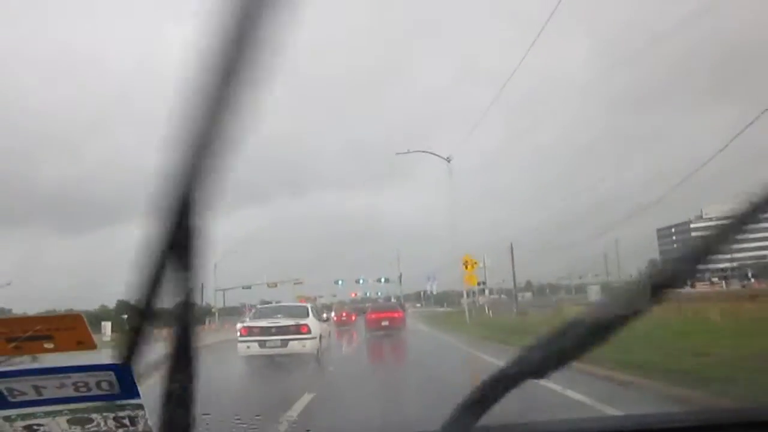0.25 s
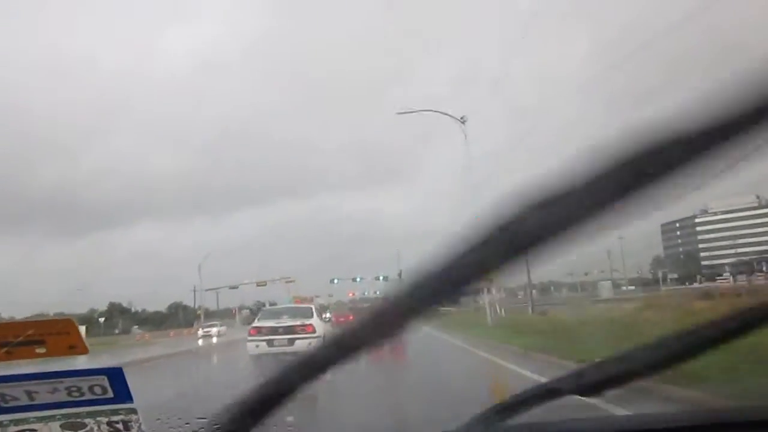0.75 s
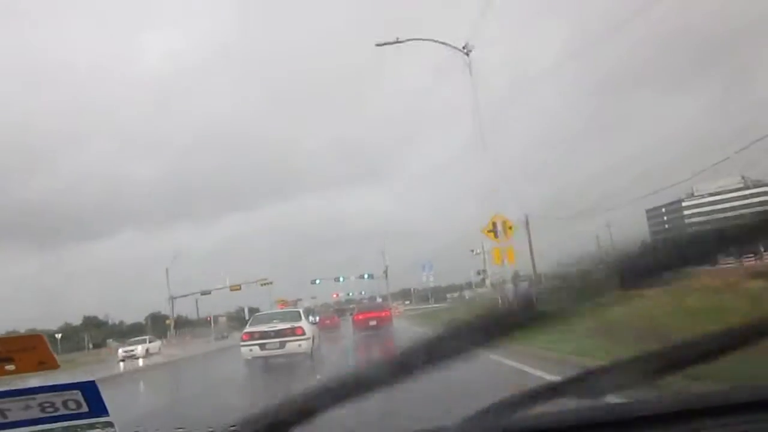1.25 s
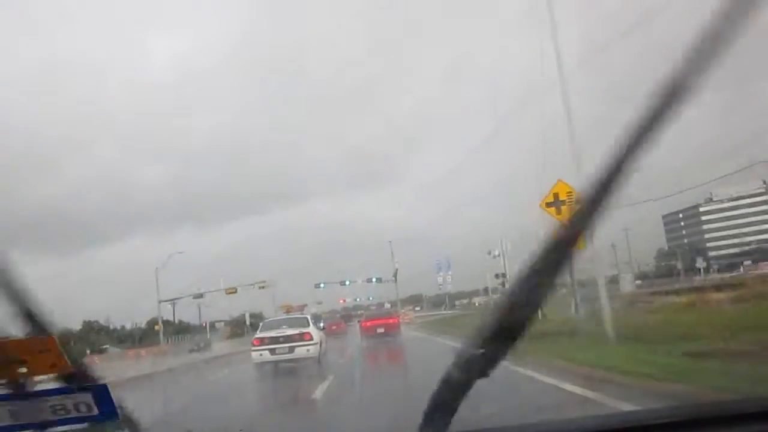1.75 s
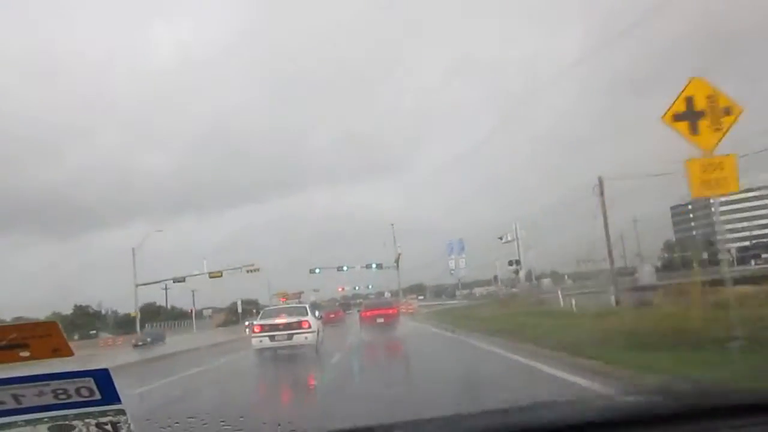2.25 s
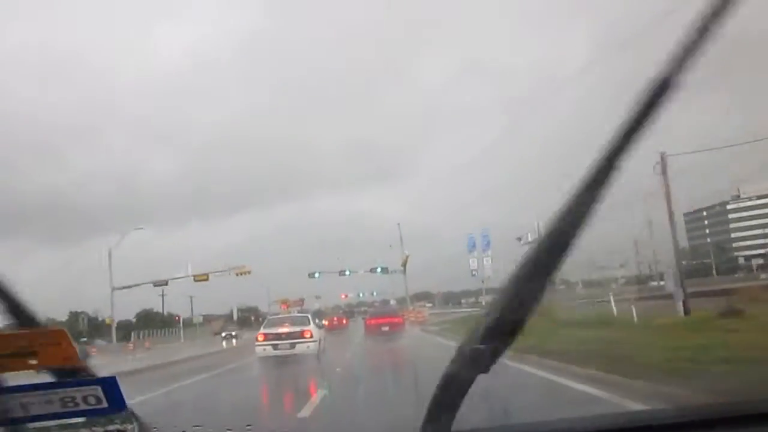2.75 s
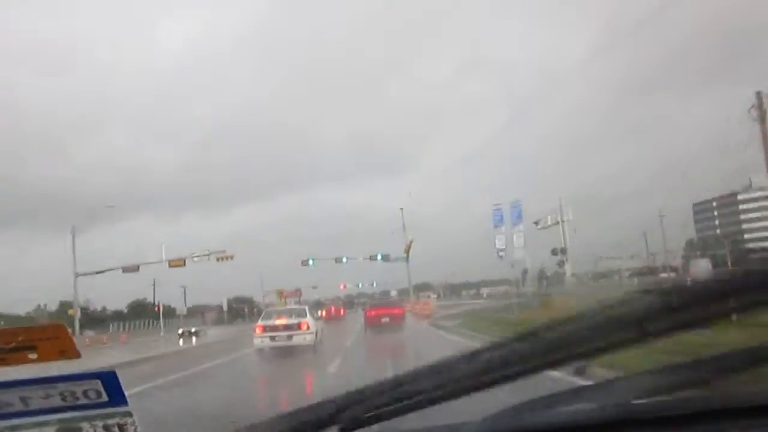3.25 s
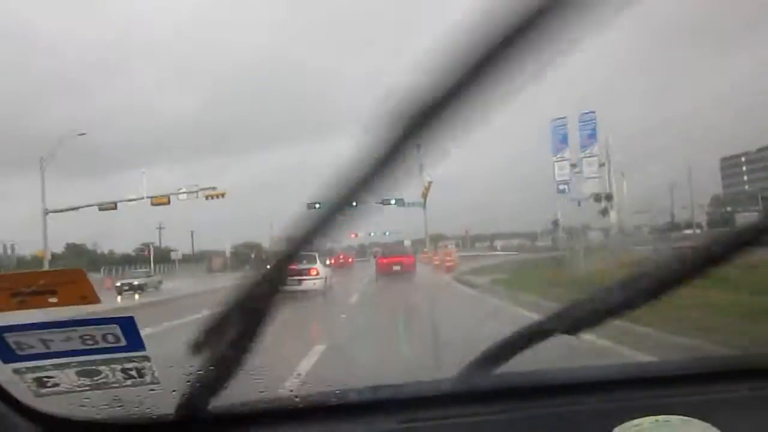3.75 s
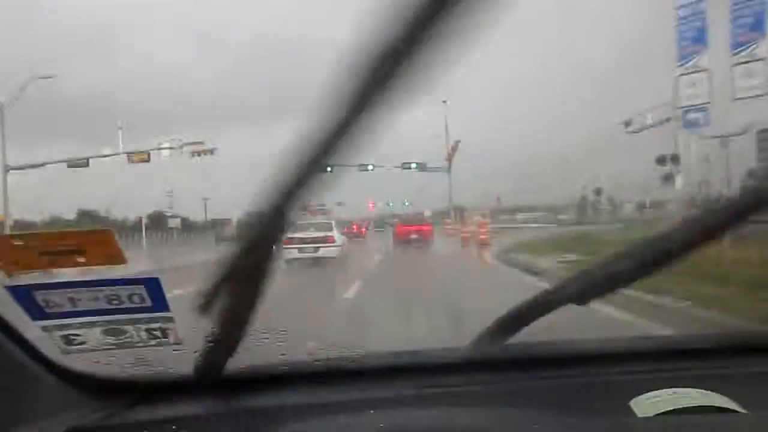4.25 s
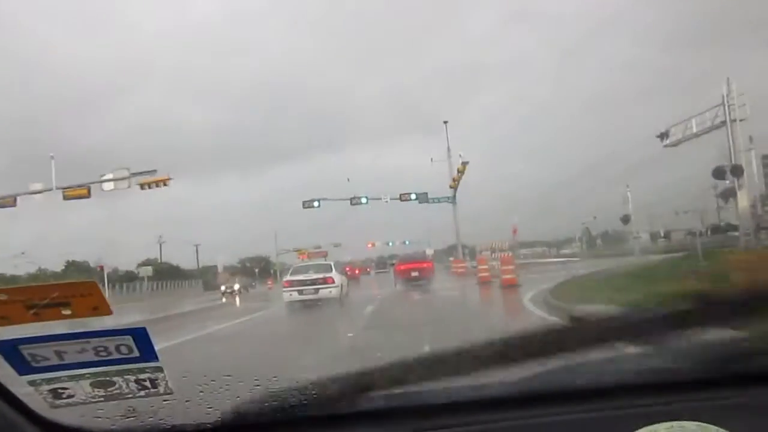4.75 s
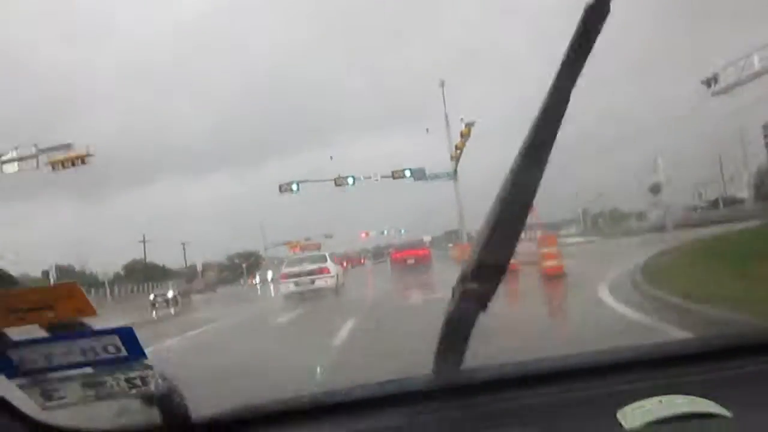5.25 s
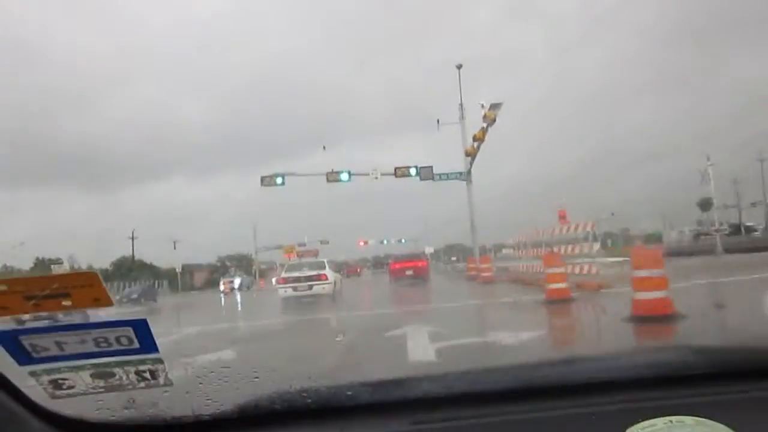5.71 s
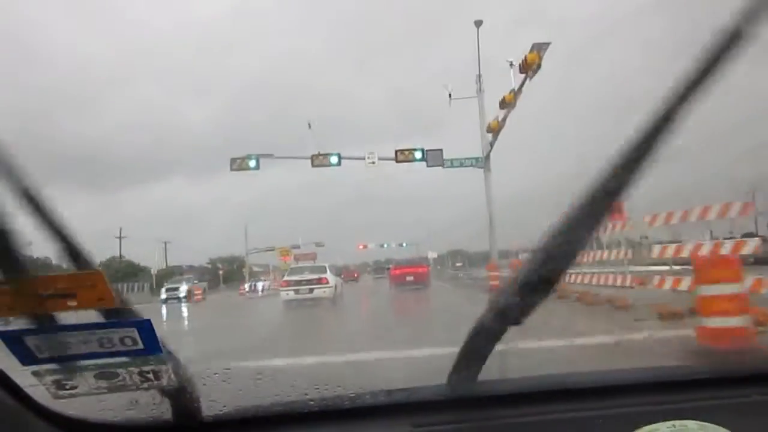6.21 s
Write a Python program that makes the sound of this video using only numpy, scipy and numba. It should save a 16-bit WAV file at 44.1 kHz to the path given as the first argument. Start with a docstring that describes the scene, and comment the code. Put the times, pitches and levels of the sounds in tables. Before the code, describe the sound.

From a small microphone in a car cabin: rain pelts glass and roof throughout over fluttering tyre and body rumble. Quick wiper blades swish, then flip and knock at the bottom of each sweep, starting just after half a second. Big drops snap sharply, loudest near 1.7 and 3 seconds. The low engine hum fades midway, while bumps and road rumble grow heavier toward the end. The sound is dry, slightly muffled and compressed.

```python
"""Inside a car on a wet road in heavy rain, heard by a small camera microphone in the cabin.
From the start rain patters on glass and roof (random clicks), the road shakes tyres and body (driven resonances)
and the engine hums (two sines). The blades soon sizzle through water (filtered clicks), large drops snap and bumps
thud (damped rings). From 0.56 s the wipers tick, knock and thump at the bottom of each sweep (rings and bursts).
The engine sinks back after about three seconds; a quick gain control rides the whole take."""
import sys
import numpy as np
from scipy import signal
from scipy.fft import rfft, irfft
from scipy.io import wavfile
from scipy.ndimage import uniform_filter1d
from numba import njit

SR = 44100
rng = np.random.default_rng(int(sys.argv[2]) if len(sys.argv) > 2 else 0)


def waveform_to_disk(signal):
    """Save audio, clipped to [-1, 1], as 16-bit WAV at the path in sys.argv[1]."""
    frames = np.transpose(np.atleast_2d(signal))
    scaled = np.clip(frames, -1, 1) * 32767
    samples = np.round(scaled).astype(np.int16)
    wavfile.write(sys.argv[1], SR, samples)


N = 285768
T = np.arange(N) / SR  # s


def undb(db):
    """Decibels to amplitude."""
    return 10 ** (np.asarray(db) / 20)


def unit(x):
    """Scale to an RMS of 1."""
    return x / np.sqrt(np.mean(x ** 2))


def columns(table):
    """Draw each column after the first as a curve over time, joining the rows by straight lines."""
    s, *rest = np.transpose(table)
    return [np.interp(T, s, column) for column in rest]


def colour(x, points):
    """Minimum-phase filter through (Hz, dB) points: folding the cepstrum keeps the response causal."""
    hz, db = np.transpose(points)
    log_grid = np.log(np.linspace(1, SR / 2, 2049))
    log_gain = np.interp(log_grid, np.log(hz), db) * np.log(10) / 20
    cepstrum = irfft(log_gain)
    cepstrum[1:2048] *= 2
    cepstrum[2049:] = 0
    impulse = irfft(np.exp(rfft(cepstrum)))[:2048]
    return signal.fftconvolve(x, impulse)[:len(x)]


def walk(rate):
    """Random levels held 1 / rate s and slewed twice."""
    k = int(SR / rate)
    held = np.repeat(rng.standard_normal(N // k + 1), k)
    return uniform_filter1d(uniform_filter1d(held, k), k)[:N]


def swells(times, heights_db, width_s):
    """Bell-shaped changes in dB around each moment; width_s is the standard deviation."""
    return sum(db * np.exp(-.5 * ((T - s) / width_s) ** 2) for s, db in zip(times, heights_db))


def ring(hz, t60, rise, sag=0., sag_s=1.):
    """A damped mode set going by a push with time constant `rise` s, its pitch sinking by the share `sag`; peak 1."""
    t = T[:SR // 4]
    turns = np.cumsum(hz * (1 - sag * (1 - np.exp(-t / sag_s)))) / SR
    x = np.sin(2 * np.pi * turns) * (1 - np.exp(-t / rise)) * np.exp(-np.log(1000) * t / t60)
    return x / np.abs(x).max()


def burst(hz, decay, sharp):
    """An impact and its splash of noise around hz, the push dying with time constant `decay` s; peak 1."""
    t = T[:SR // 4]
    push = rng.standard_normal(len(t)) * np.exp(-t / decay)
    push[0] = 5  # the impact itself
    b, a = signal.iirpeak(hz, sharp, SR)
    x = signal.lfilter(b, a, signal.lfilter(b, a, push))
    return x / np.abs(x).max()


def add(out, s, x):
    """Lay a sound into the mix from s seconds on."""
    i = int(s * SR)
    out[i:i + len(x)] += x[:N - i]


def cabin(x, t60=0.06, wet_db=-4):
    """Upholstered cabin: a short diffuse tail behind each sound."""
    t = T[:SR // 8]
    tail = rng.standard_normal(len(t)) * np.exp(-np.log(1000) * t / t60)
    tail *= undb(wet_db) / np.sqrt(np.sum(tail ** 2))
    tail[0] = 1  # direct sound
    return signal.oaconvolve(x, tail)[:len(x)]


def patter(rate, spread_db, count=10):
    """Drops at random moments, `rate` a second, few large and most small; each patch has its own path to the ear."""
    out = 0
    for _ in range(count):
        when, largeness, side = rng.random((N, 3)).T
        rarity = np.minimum(-np.log(1 - largeness), 5.5)  # the largest drops break up in the air
        drops = (when < rate / count / SR) * undb(spread_db * rarity) * np.sign(side - .5)
        out = out + cabin(drops)
    return out


# Every turn of the wipers, at the top and bottom of the sweep; rain and road use it too.
# Each row: moment in seconds, linkage shudder in dB, water flung off the blade in dB,
# depth of the dip that follows in dB (below zero it is a lift).
TURNS = [(0.145, 5, 6, 4), (.572, 5.5, 3, 4), (1.01, 1.5, 3.5, 2), (1.44, 2, -2, 2), (1.87, 6, 2, 4),
         (2.29, 7, 1.5, 1.5), (2.749, 3.5, 2, 1), (3.159, 7.5, -2, 4), (3.622, 3.5, 0, 3.5),
         (4.029, 0, 0, 5.5), (4.452, 0, -3, -0.5), (4.88, 1.5, 1.5, 4), (5.31, -0.5, -3, 2.5),
         (5.75, 1, 3.5, 3.5), (6.17, 3, 3.5, 1.5)]
# Other moments where the level drops away at once. Each row: moment in seconds, depth of the dip in dB.
SUDDEN_DIPS = [(2.51, 5.5), (3.041, 3.5), (3.711, 1), (4.79, 2), (5.6, 5.5)]
DIP_AFTER_S, DROP_S, RECOVER_S = 0.023, 0.001, 0.13  # delay after a turn; time constants down and back


def dips():
    """The level drops quickly after a wiper turn or at other set moments and climbs back slowly (dB)."""
    total_db = 0
    for s, db in [(s + DIP_AFTER_S, db) for s, _, _, db in TURNS] + SUDDEN_DIPS:
        since = np.maximum(T - s, 0)
        total_db = total_db - db * (1 - np.exp(-since / DROP_S)) * np.exp(-since / RECOVER_S)
    return total_db


# Rain over the cabin. Each row: moment in seconds, glass level in dB, roof against glass in dB,
# fine spray against glass in dB.
RAIN = [(0, -29.5, -1, -7), (.5, -29, -0.5, -8), (1, -30, -1, -7), (1.5, -28, -2, -9.5), (2.1, -29, -2, -6),
        (2.9, -27.5, -3.5, -16), (3.3, -29.5, -0.5, -1), (3.6, -30, -0.5, -4), (3.9, -30.5, -1.5, -3.5),
        (4.27, -30, -1.5, -7), (4.37, -26, -1.5, -6.5), (4.5, -29.5, 0.5, -6), (5.1, -31.5, 1, -5.5),
        (5.6, -31, 0.5, -5.5), (6, -33.5, 1.5, -5), (6.48, -32.5, 0, -4.5)]
# Tone of the drops on the windscreen. Each row: frequency in Hz, relative density in dB per Hz.
GLASS = [(700, -24), (1300, 3.5), (1700, -3.5), (2000, -0.5), (2400, -0.5), (2900, 2), (3600, 4.5),
         (4300, 1.5), (5500, -8), (8000, -18)]
# Tone of the drops on the lined roof. Each row: frequency in Hz, relative density in dB per Hz.
ROOF = [(350, -21), (520, 7), (650, 0), (950, 3), (1250, -1), (1600, -2.5), (2200, -6), (4000, -56)]
# Tone of the fine spray. Each row: frequency in Hz, relative density in dB per Hz.
SPRAY = [(2000, -28.5), (3000, -13.5), (3800, 9), (5000, 7), (6500, 4), (8000, -9)]
FLING_S = 0.0062  # standard deviation of the fling at each wiper turn


def rain():
    """The same shower patters on the windscreen, drums dully on the lined roof and fizzes as spray; gusts bunch it."""
    glass_db, roof_db, spray_db = columns(RAIN)
    s, _, fling_db, _ = np.transpose(TURNS)
    gust_db = walk(24.85) + swells(s, fling_db, FLING_S) + dips()
    large = unit(patter(900, spread_db=-0.5))  # shared by all three
    glass = unit(colour(unit(patter(6000, spread_db=0.5)) + undb(-4.0) * large, GLASS))
    roof = unit(colour(unit(patter(3000, spread_db=1.5)) + undb(-6.5) * large, ROOF))
    spray = unit(colour(unit(patter(7000, spread_db=5.5)) + undb(-17.0) * large, SPRAY))
    return undb(glass_db + gust_db) * (glass + undb(roof_db) * roof + undb(spray_db) * spray)


FLUTTER_DB, FLUTTER_PER_S = 2.5, 12  # scale and rate of each resonance's own flutter


def shaken(modes):
    """Noise ringing a set of resonances, each with its own fluttering drive."""
    total = 0
    for hz, width_hz, db in modes:
        level = undb(db + FLUTTER_DB * walk(FLUTTER_PER_S))
        b, a = signal.iirpeak(hz, hz / width_hz, SR)
        total = total + level * unit(signal.lfilter(b, a, rng.standard_normal(N)))
    return unit(total)


# Road felt through the body. Each row: moment in seconds, cabin boom in dB, floor pan in dB, door panels in dB.
ROAD = [(0, -30, -30.5, -30.5), (.18, -20.5, -24, -31), (.45, -29.5, -24.5, -27.5),
        (.72, -24.5, -27.5, -32), (1.05, -27.5, -24.5, -28.5), (1.3, -27, -27, -29),
        (1.55, -23.5, -26.5, -29.5), (1.8, -27.5, -28, -27), (2.1, -28.5, -27, -29),
        (2.55, -25, -29.5, -30.5), (2.85, -31, -23.5, -25.5), (3.1, -28.5, -28.5, -33.5),
        (3.4, -26.5, -23, -25.5), (3.78, -21, -28.5, -34), (3.9, -22, -21, -33), (4.4, -21, -24, -26.5),
        (5, -21.5, -24, -30.5), (5.3, -22.5, -22.5, -25), (5.62, -22, -22.5, -25.5),
        (5.95, -22, -20.5, -28.5), (6.28, -24.5, -20, -26), (6.48, -23, -18.5, -34.5)]
# Resonances of the cabin air. Each row: frequency in Hz, width in Hz, relative level in dB.
BOOM = [(24.2, 18, -11.5), (38, 12, 0), (52.4, 16, -2), (65.5, 13, -7.5)]
# Resonances of the floor pan. Each row: frequency in Hz, width in Hz, relative level in dB.
FLOOR_PAN = [(99.3, 16, 1.5), (125.7, 14, 1.5), (156.2, 17.2, 2.5), (185.4, 21, -1.5)]
# Resonances of the door panels. Each row: frequency in Hz, width in Hz, relative level in dB.
PANELS = [(221.5, 80, -6), (289, 35, -3.5), (308, 27, -3), (321, 54, -11.5), (408, 47, -1.5), (494, 71, -6)]
# Tyre cavity ring. Each row: moment in seconds, level in dB.
CAVITY = [(0, -36), (.3, -43), (.45, -33), (.8, -38.5), (2, -39.5), (2.3, -37.5), (2.7, -40), (2.92, -30),
          (3.12, -46), (3.4, -30.5), (3.7, -39), (4.35, -37.5), (4.5, -31.5), (5.05, -38.5), (5.2, -33),
          (5.6, -36.5), (5.72, -27.5), (6, -26.5), (6.1, -31.5), (6.27, -28.5), (6.48, -39.5)]
# Bumps in the road. Each row: start in seconds, peak in dB, starting pitch in Hz.
JOINTS = [(0.114, -16, 60.6), (0.768, -23, 62.6), (1.834, -26, 294), (1.858, -20, 304.9),
          (1.869, -19, 59.6), (2.264, -14.5, 138), (2.941, -17, 293), (3.859, -10.5, 153),
          (3.933, -23, 67.8), (3.94, -13.5, 153), (4.093, -20, 107), (5.006, -19, 122), (5.542, -13, 144),
          (5.569, -9.5, 163), (6.134, -15, 101)]
CAVITY_HZ, CAVITY_WAVER_HZ = 252.2, 3.0
SHUDDER_S = 0.042  # standard deviation of the shudder at each wiper turn
PANEL_SHARE, BOOM_SHARE = 0.67, 0.27  # part of the shudder dB that reaches door panels and cabin air
PANEL_DIP_SHARE = 0.38  # part of the dip dB that reaches floor pan and door panels
BUMP_SAG, BUMP_SAG_S = 0.5, 0.04  # a bump's pitch sinks by this share as the suspension settles


def road():
    """Rough tarmac shakes cabin air, floor pan, door panels and tyre cavities; wiper turns shudder, bumps thud."""
    (boom_db, pan_db, panel_db), (cavity_db,) = columns(ROAD), columns(CAVITY)
    s, shudder_db, _, _ = np.transpose(TURNS)
    shudder = swells(s, shudder_db, SHUDDER_S)
    dip = PANEL_DIP_SHARE * dips()
    boom = undb(boom_db + BOOM_SHARE * shudder + 1.2 * walk(6)) * shaken(BOOM)
    floor_pan = undb(pan_db + shudder + dip) * shaken(FLOOR_PAN)
    panels = undb(panel_db + PANEL_SHARE * shudder + dip + 0.75 * walk(8.9)) * shaken(PANELS)
    cavity_phase = 2 * np.pi * np.cumsum(CAVITY_HZ + CAVITY_WAVER_HZ * walk(8)) / SR
    cavity = np.sqrt(2) * undb(cavity_db) * np.sin(cavity_phase)
    out = boom + floor_pan + panels + cavity
    for s, db, hz in JOINTS:
        add(out, s, undb(db) * ring(hz, 0.082, 0.0018, BUMP_SAG, BUMP_SAG_S))
    return out


# Engine heard through its mounts. Each row: moment in seconds, firing rate in Hz, level in dB,
# third multiple against it in dB.
ENGINE = [(0, 49.13, -29.5, -9), (.5, 49.9, -24, -6), (1, 51.72, -29, -8), (1.6, 52.5, -27, -18.5),
          (2.1, 52.67, -25, -8.5), (2.45, 55.5, -28, -17), (2.65, 54.4, -34, -12.5), (3.2, 52, -29.5, -20),
          (3.6, 47.8, -40, -9.5), (6.48, 44.4, -36, -16.5)]


def engine():
    """The firing rate and its third multiple hum through the mounts, wandering a little in pitch and level."""
    hz, db, third_db = columns(ENGINE)
    phase = 2 * np.pi * np.cumsum(hz * (1 + .012 * walk(9))) / SR
    hum = np.sin(phase) + undb(third_db) * np.sin(3 * phase)
    return np.sqrt(2) * undb(db + 1.8 * walk(7)) * hum


# Wiper strokes across the windscreen. Each row: middle of the stroke in seconds, wash level in dB.
STROKES = [(.4, -37), (.88, -35), (1.3, -35), (1.72, -38), (2.13, -44), (2.62, -30.5), (2.92, -38.5),
           (3.5, -34), (3.8, -32), (4.3, -39), (4.7, -36), (5.151, -35), (5.5, -36), (6.05, -33),
           (6.397, -39.5)]
# Tone of the water ahead of the blade. Each row: frequency in Hz, relative density in dB per Hz.
WASH = [(2200, -20), (3000, -6), (3700, 3), (4500, 1), (5500, -7.5), (7000, -10.5)]
STROKE_S = 0.15  # standard deviation of the swell


def wash():
    """Each blade drives a film of water ahead of it: a fine sizzle that swells with the arm's speed."""
    middles, levels_db = np.transpose(STROKES)
    speed = swells(middles, undb(levels_db), STROKE_S)  # amplitudes here, not dB
    sizzle = unit(colour(patter(4000, spread_db=4.0, count=4), WASH))
    return speed * undb(dips()) * sizzle


# Heavy drops on the car; the low ones land on the roof. Each row: start in seconds, level in dB, centre in Hz.
DROPS = [(0.1436, -21, 4200), (0.9412, -15, 4300), (1.017, -20, 3700), (1.177, -8, 5300), (1.736, -5, 3600),
         (1.745, -12, 4300), (2.234, -16, 3320), (2.7443, -14.5, 3600), (2.9104, -15, 3600),
         (2.8415, -18, 900), (2.9885, -15, 600), (3.0203, -4, 4400), (3.032, -8, 5200), (3.3822, -12, 3920),
         (3.5673, -18, 4200), (3.8426, -22, 4350), (3.887, -13, 696), (4.16, -12, 1700), (4.358, -17, 3900),
         (4.373, -7, 3600), (4.388, -22, 3400), (4.474, -17, 4440), (5.0899, -10, 1000), (5.176, -15, 5960),
         (5.807, -14, 4200), (6.189, -10, 6240)]


def heavy_drops():
    """Single large drops: a snap lasting a few cycles, half splash and half ring, then the cabin."""
    out = np.zeros(N)
    for s, db, hz in DROPS:
        snap = (burst(hz, 1.8 / hz, .6) + ring(hz, 7 / hz, .1 / hz)) / 2
        add(out, s, undb(db) * cabin(snap, wet_db=-6))
    return out


# Bottom of each sweep. Each row: start in seconds, blade tick level in dB, tick pitch in Hz,
# its high ring against it in dB, delay until the arms reverse in seconds, knock level in dB, thump level in dB.
BOTTOMS = [(0.5596, -16, 4200, -6, 0.013, -12.5, -14), (1.422, -18, 4200, -6, .016, -11, -16),
           (2.279, -25, 4300, -3, 0.029, -17, -26), (3.1476, -20, 4400, -3, .019, -12.5, -18),
           (4.0067, -21, 4400, -2, .018, -14, -20), (4.8715, -20, 4100, 1, .023, -10.5, -20),
           (5.7365, -21, 4300, -6, .019, -15, -22)]
# Wiper arm modes. Each row: frequency in Hz, time to fall 60 dB in seconds, relative level in dB.
ARM = [(824, 0.05, 2), (1020, 0.03, 0), (1320, 0.04, -3), (500, 0.04, 5), (318.3, 0.05, 3)]
TICK_TOP_HZ, TICK_SAG, TICK_SAG_S = 6000, .35, .004  # high ring; share and time constant of the pitch fall


def wipers():
    """The rubber flips with a snap sinking in pitch; the arms knock against their slack and thump the bulkhead."""
    out = np.zeros(N)
    for s, tick_db, hz, high_db, later, knock_db, thump_db in BOTTOMS:
        snap = undb(-2) * ring(hz, .018, .0005, TICK_SAG, TICK_SAG_S) + undb(2) * burst(.9 * hz, .005, 1.)
        top = undb(-5) * ring(TICK_TOP_HZ, .012, .0005) + burst(TICK_TOP_HZ, .004, 3.)
        add(out, s, undb(tick_db) * cabin(snap + undb(high_db) * top, wet_db=-10))

        arm = sum(undb(mode_db) * ring(mode_hz, t60, 0.001) for mode_hz, t60, mode_db in ARM)
        knock = arm + undb(7) * burst(1000.0, 0.007, .7)
        knock = knock / np.abs(knock).max()
        add(out, s + later, undb(knock_db) * cabin(knock, wet_db=-10))

        thump = ring(100, 0.14, 0.0095) + undb(-4) * ring(174, 0.09, 0.0029)
        add(out, s + later - .006, undb(thump_db) * thump)  # its slow rise begins before the knock
    return out


def scene():
    """Everything in the cabin, before the microphone."""
    return (rain() + wash() + heavy_drops() + road() + engine() + wipers())[None]


@njit
def follow(x, start, attack, release):
    """Envelope that rises quickly and sinks slowly."""
    e, out = start, np.empty(len(x))
    for i in range(len(x)):
        e += (abs(x[i]) - e) * (attack if abs(x[i]) > e else release)
        out[i] = e
    return out


# Response of the small camera microphone. Each row: frequency in Hz, gain in dB.
MICROPHONE = [(20, 0.5), (4200, -1.5), (4800, -3), (5500, -11), (6300, -18), (7000, -18.5), (7500, -25.5),
              (8000, -64), (9000, -79)]
ATTACK_S, RELEASE_S = 0.0016, 0.15  # time constants of the gain control
AIM_DB, GAIN_POWER = -14.0, 0.22  # envelope left unchanged; share of the dB distance from it taken away
TOP_HZ = 7850  # edge of the steep treble cut


def record(dry):
    """The gain control ducks after loud thumps and recovers quickly, peaks are rounded, the treble falls away."""
    heard = colour(dry[0], MICROPHONE)
    aim = undb(AIM_DB)
    envelope = follow(heard, aim, 1 / (ATTACK_S * SR), 1 / (RELEASE_S * SR))
    held = heard * (aim / envelope) ** GAIN_POWER
    rounded = np.tanh(1.06 * held)
    treble_cut = signal.ellip(10, .2, 80, TOP_HZ, fs=SR, output="sos")
    return signal.sosfilt(treble_cut, rounded)[None]


dry = scene()
out = record(dry)
waveform_to_disk(out)
```